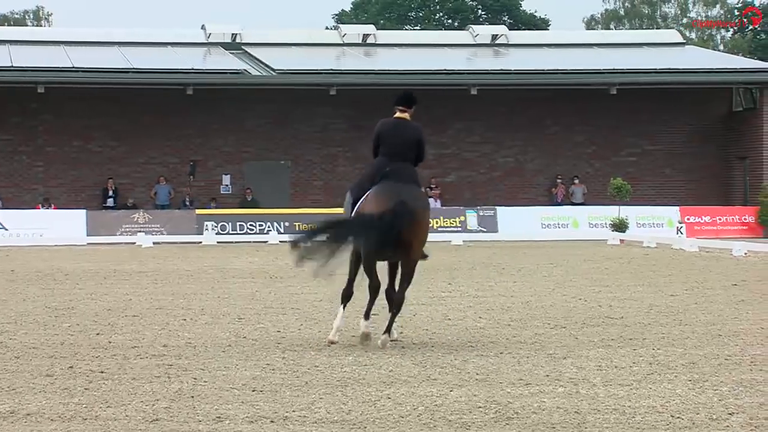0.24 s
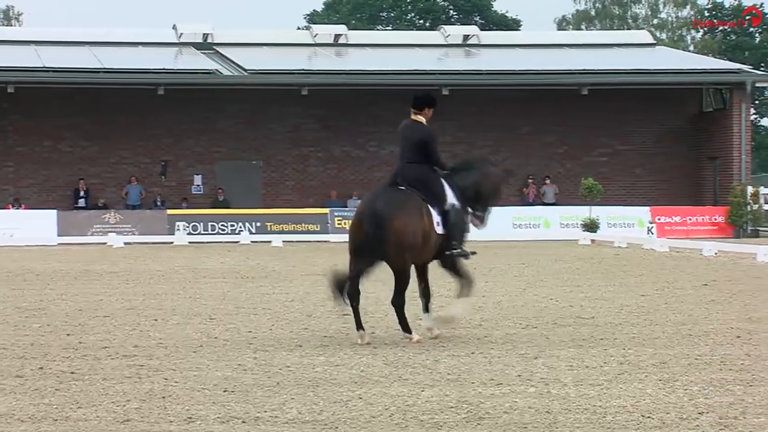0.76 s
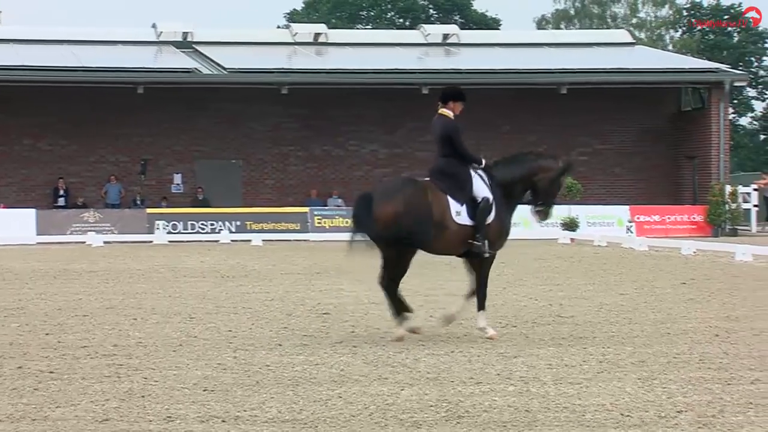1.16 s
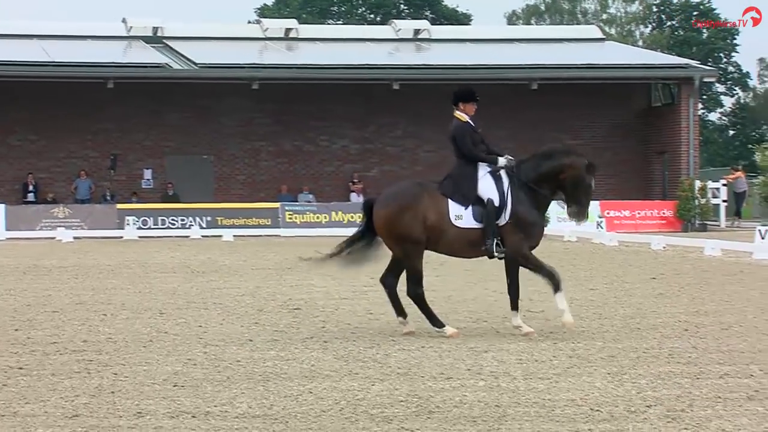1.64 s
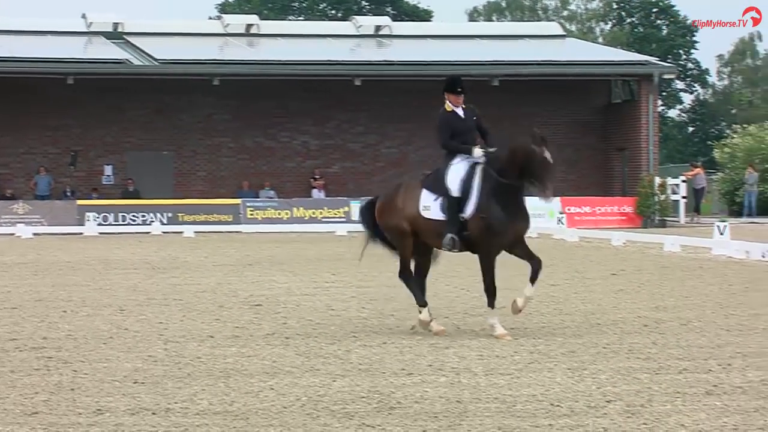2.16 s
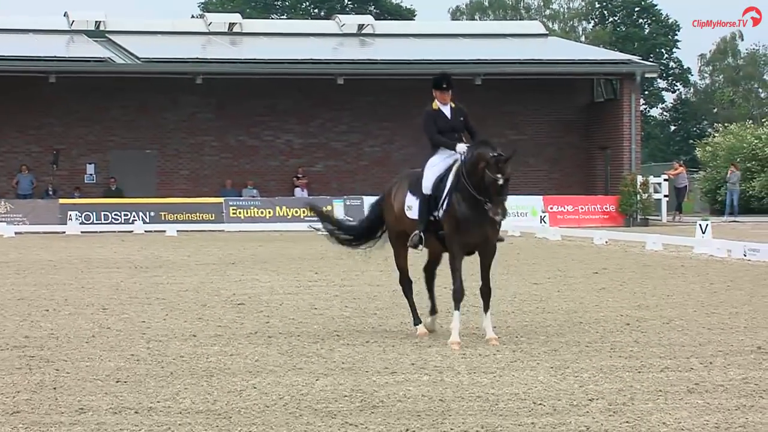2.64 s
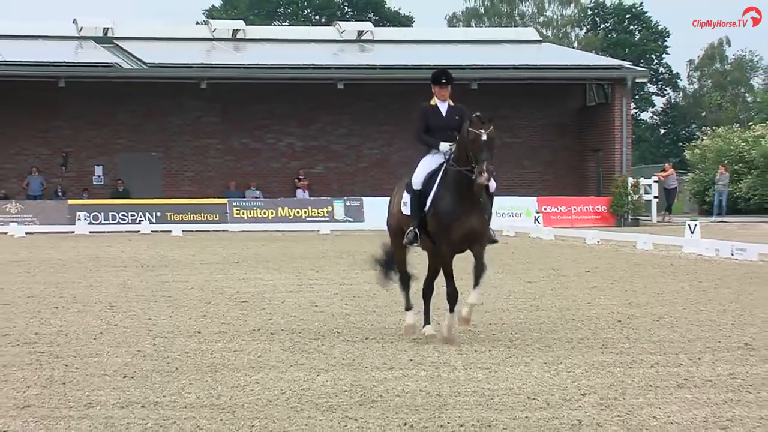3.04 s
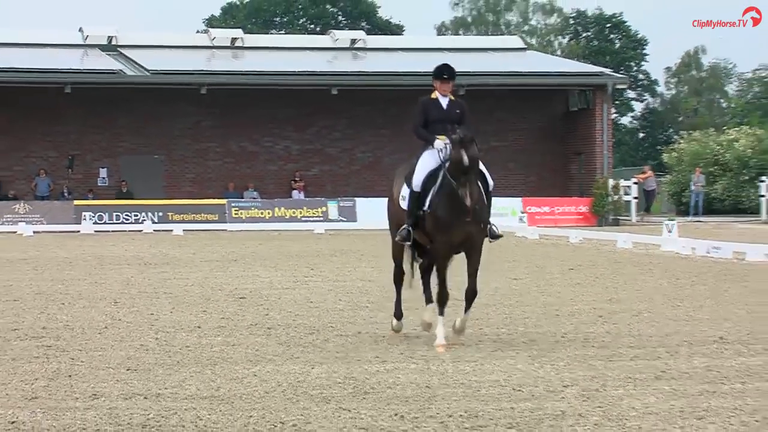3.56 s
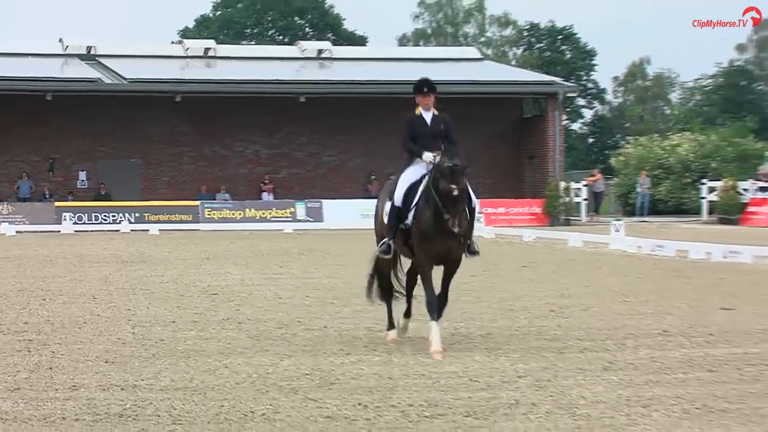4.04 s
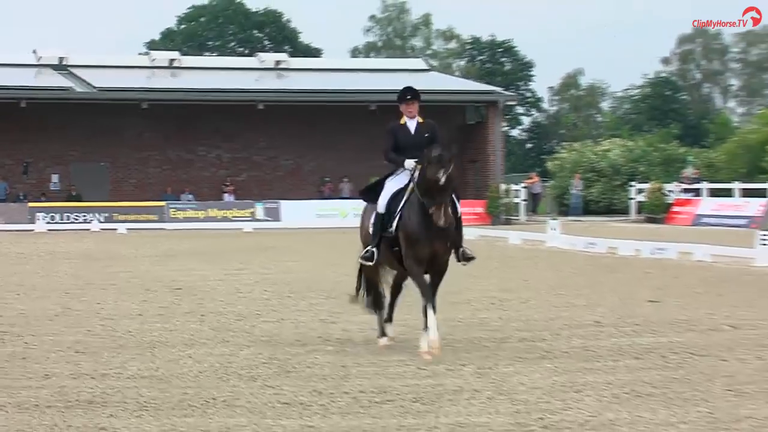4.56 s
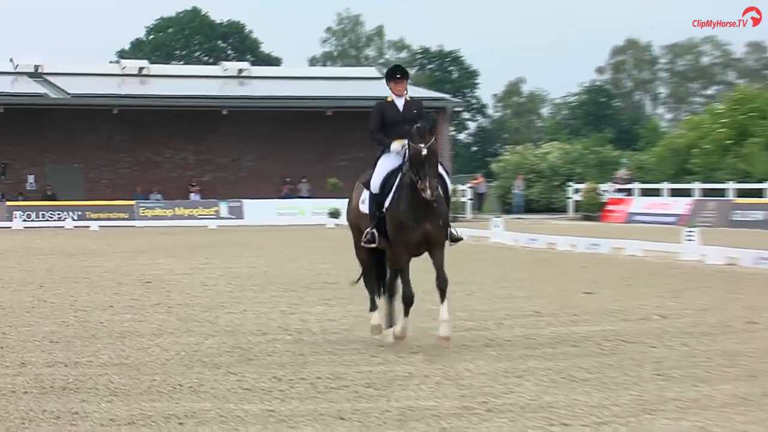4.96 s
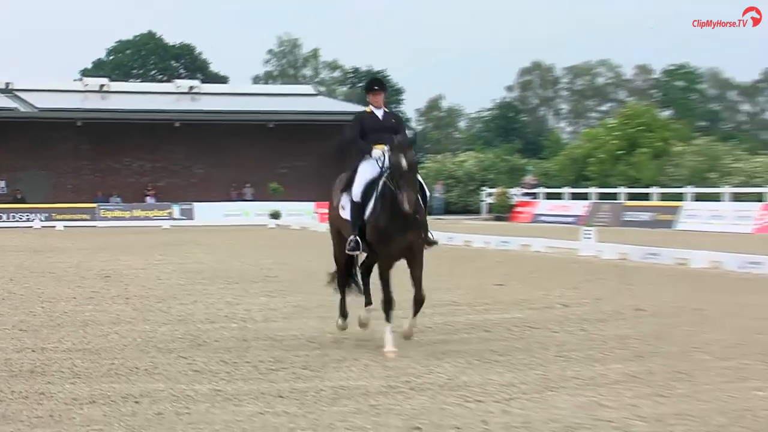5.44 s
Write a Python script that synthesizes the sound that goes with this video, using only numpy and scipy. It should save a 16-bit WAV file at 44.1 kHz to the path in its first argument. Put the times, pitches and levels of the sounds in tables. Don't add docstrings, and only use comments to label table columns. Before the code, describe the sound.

Outdoors in a sandy riding arena, a horse canters slowly: clustered dull thuds with woody knocks, about every 0.6 to 0.8 seconds. Each stride brings a low, fluttering snort, some followed by a thin inward hiss. Buckles tick faintly. Birds chirp near and far, with a livelier singer in the second half. Deep wind buffets bump the microphone over a quiet airy floor.

```python
import sys
import numpy as np
from scipy import signal
from scipy.fft import rfft, irfft
from scipy.io import wavfile
from scipy.ndimage import uniform_filter1d, map_coordinates

SR = 44100
rng = np.random.default_rng(int(sys.argv[2]) if len(sys.argv) > 2 else 0)


def digitize_waveform(pressure):
    field = np.atleast_2d(pressure).T
    bounded = np.clip(field, -1, 1)
    quanta = np.round(bounded * 32767).astype(np.int16)
    wavfile.write(sys.argv[1], SR, quanta)


def to_linear_factor(level_db):
    exponent = np.asarray(level_db, float) / 20
    return 10 ** exponent


N = 251811

UP_AND_DOWN, UP_AND_HOLD, DOWN = (-.85, -1), (-1, .25), (1, -.75)
# t/s, length/s, start f/Hz, end
# f/Hz, level/dB
TRILLS = [(-.05, .17, 2020, 2090, -67), (.11, .1, 2090, 2130, -72), (.1, .09, 2280, 2420, -72),
          (.175, .12, 2410, 2190, -70), (.32, .05, 2280, 2310, -75), (.4, .04, 2300, 2300, -88),
          (.425, .045, 6620, 6680, -80), (2.88, .08, 6800, 6700, -82), (.47, .1, 6680, 6600, -89),
          (.495, .03, 3400, 3100, -75), (.55, .025, 3250, 3200, -74), (.585, .05, 3000, 3150, -76)]
# t/s, length/s, start f/Hz, end f/Hz, level/dB
BEADS = [
    (1.534, .027, 2120, 2080, -68),
    (1.699, .066, 2160, 2130, -67),
]
# t/s, length/s, start f/Hz, end f/Hz, level/dB
RATTLE = [
    (5.632, .09, 4150, 2650, -58),
]
# t/s, length/s, top f/Hz, swing/share, level/dB
ARCHES = [(.026, .02, 5250, .25, -73), (.119, .025, 5300, .27, -71), (.207, .03, 3950, .17, -72),
          (.216, .022, 5150, .22, -72), (.254, .025, 3240, .14, -70), (.326, .042, 6100, .33, -75),
          (.794, .03, 5880, .14, -74), (.826, .042, 4750, .17, -65), (.075, .025, 5250, .18, -75),
          (1.409, .025, 3180, .1, -72), (1.968, .035, 5400, .2, -76), (2.105, .035, 5250, .13, -77),
          (2.027, .06, 2240, .25, -65), (2.18, .2, 1590, .02, -69), (2.323, .03, 5350, .1, -76),
          (2.57, .03, 3900, .13, -70), (2.614, .025, 3180, .09, -70), (3.237, .025, 5040, .16, -74),
          (4.588, .03, 5710, .16, -69), (4.936, .035, 5750, .13, -74)]
# t/s, length/s, middle f/Hz, swing/share, level/dB
RISES = [(.659, .015, 3500, .12, -71), (.736, .035, 4400, .17, -70), (.742, .025, 5470, .05, -71),
         (.803, .028, 3900, .12, -69), (.893, .035, 3700, .1, -70), (1.458, .08, 2370, .08, -74),
         (1.5, .035, 2110, .02, -63), (1.672, .035, 2220, .05, -72), (1.985, .05, 1700, .08, -68),
         (2.19, .045, 4200, .26, -75), (2.056, .035, 4200, .23, -74), (3.041, .055, 2300, .3, -77),
         (3.045, .045, 4700, .2, -74), (3.12, .02, 3000, .08, -76), (3.369, .025, 4900, .04, -69),
         (3.72, .02, 3250, .07, -70), (3.67, .012, 3300, .2, -70), (4.625, .02, 3900, .05, -68),
         (4.659, .035, 4820, .05, -60), (4.687, .022, 3750, .06, -53), (5.265, .02, 5700, .16, -68),
         (5.374, .018, 5700, .16, -72), (5.616, .014, 4000, .3, -67), (5.628, .022, 4700, .02, -66),
         (5.256, .012, 5200, .3, -72)]
# t/s, length/s, middle f/Hz, swing/share, level/dB
DROPS = [(.34, .03, 4500, .05, -74), (.742, .03, 5000, .05, -68), (.768, .015, 4200, .14, -72),
         (.925, .014, 3600, .12, -74), (2.59, .014, 3500, .15, -72), (3.388, .01, 4600, .1, -72),
         (.228, .014, 3600, .15, -72), (.195, .02, 5700, .08, -77), (.715, .04, 2480, .02, -81),
         (1.985, .03, 3600, .08, -75), (2.325, .02, 3700, .1, -75), (3.765, .02, 5700, .06, -72),
         (3.735, .015, 2900, .08, -73), (1.553, .025, 5450, .06, -69), (1.908, .025, 5500, .06, -76),
         (4.725, .03, 5500, .1, -70), (2.485, .06, 2180, .29, -71), (2.58, .035, 2290, .15, -70),
         (3.1, .045, 4600, .09, -75), (3.14, .028, 3500, .22, -72), (4.7, .028, 3300, .3, -57),
         (5.196, .12, 2280, .02, -79), (5.282, .028, 3150, .21, -69)]
# (t after start/s, length/s, middle f/Hz, swing/share, level/dB), shape
HOOK = [((0, .014, 3600, .26, -3), (-1, .2)), ((.006, .03, 3830, .015, 0), UP_AND_DOWN),
        ((.031, .02, 4250, .3, -3), (1, -.15))]
FALL = [((0, .047, 3200, .42, 0), (1, -.3))]
SCOOP = [((0, .009, 3900, .4, -12), (1, -.4)), ((.007, .02, 2750, .2, -9), (1, -.7)),
         ((.028, .025, 3170, .12, 1), (-1, 0)), ((.048, .028, 2400, .3, -18), DOWN)]
PIP = [((0, .03, 5390, .045, 0), DOWN)]
# t/s, pitch/ratio, level/dB
HOOKS = [
    (3.259, 1.1, -67.5),
    (3.475, 1.07, -65),
    (3.679, 1.05, -61.5),
    (3.855, 0.995, -56.5),
    (4.032, 1.024, -57),
]
SCOOPS = [
    (4.704, 0.95, -57.5),
    (4.852, 1.02, -56),
    (4.99, 0.99, -54),
    (5.125, 1.01, -53.5),
    (5.47, 0.97, -58.5),
]
PIPS = [
    (4.165, 1.01, -74),
    (4.31, 1, -74),
    (4.522, 1.001, -69),
    (4.734, 1.3, -79),
]
TRILL_PER_S, BEAD_PER_S, BUZZ_PER_S, RATTLE_PER_S = 62, 76, 170, 68
RATTLE_FADE_DB = 5
FALL_FROM_S, FALL_EVERY_S, FALL_DB = 4.134, .0834, -56.5

# t of closing/s, jet level/dB
FLAPS = [(0.103, -83), (0.784, -79), (0.825, -88), (0.871, -82.5), (0.92, -86), (1.06, -85), (1.099, -84.5),
         (1.152, -85), (1.84, -83), (1.895, -89), (1.953, -84), (2.303, -79), (2.675, -78), (2.718, -76.5),
         (2.777, -78), (2.835, -78), (3.432, -82), (3.472, -82), (3.534, -77.5), (3.583, -75),
         (3.632, -75.5), (4.119, -80), (4.173, -76.5), (4.223, -70.5), (4.262, -76), (4.275, -75),
         (4.758, -76), (4.804, -72), (4.845, -74), (4.857, -74.5), (4.893, -72.5), (4.905, -67.5),
         (4.948, -79), (5.355, -76), (5.4, -72.5), (5.446, -68), (5.489, -77.5), (5.502, -68.5)]
# f/Hz, level/dB per Hz
ROAR = [(41, -41), (70, -10), (139, -3.5), (187, -9.5), (404, -10), (499, -13.5), (616, -11.5),
        (1220, -27.5), (2000, -22.5), (2600, -81), (4400, -120)]
# f/Hz, level/dB per Hz
JET = [(901, 6.5), (1501, -10), (2501, -8), (5001, -9), (7501, -10.5), (10001, -16.5), (13001, -25),
       (16001, -28)]
LEAK_DB = -9.5
NOSTRIL_HZ, NOSTRIL_WIDTH_HZ, NOSTRIL_DB = 1720, 237, 1
# t/s, length/s, level/dB, top f/Hz, chest rumble level/dB
BLOWS = [(0, 0.43, -62, 670, 0), (0.723, 0.25, -66, 885, 6), (1.016, 0.22, -59.5, 1040, -6.5),
         (1.497, 0.26, -55.5, 458, -9.5), (1.795, 0.22, -59.5, 980, 0.5), (2.202, 0.51, -62, 690, -4.5),
         (2.628, 0.26, -57.5, 1060, -8.5), (3.236, 0.21, -64, 765, 4.5), (3.393, 0.32, -57.5, 1060, -3),
         (3.715, 0.36, -60.5, 630, -1), (4.053, 0.29, -58, 1080, 1.5), (4.435, 0.23, -59, 720, 4),
         (4.684, 0.3, -55, 1050, 0.5), (5.035, 0.29, -58, 690, -7.5), (5.309, 0.28, -55.5, 1170, -1),
         (5.578, 0.4, -61.5, 594, -1.5)]
# t/s, length/s, level/dB
INTAKES = [
    (1.534, 0.23, -81),
    (2.43, 0.19, -82.5),
    (2.874, 0.15, -102),
    (3.184, 0.2, -82),
    (3.764, 0.26, -81),
    (4.446, 0.21, -77),
    (5.056, 0.22, -75),
    (5.61, 0.15, -84),
    (0.71, 0.26, -82),
]
# f/Hz, width/Hz, level/dB
INHALE = [(1800, 1360, 5), (5670, 1200, 2), (6440, 280, 3), (9250, 2700, -5.5), (9080, 1540, -3.5)]

# t/s, level/dB
CHORUS = [(0, -83.5), (.8, -78.5), (1.6, -80), (2.4, -86.5), (3.1, -82.5), (3.75, -75.5), (4.3, -73.5),
          (4.7, -70.5), (5.71, -78)]
# t/s, half width/s, level/dB
BUFFETS = [(.2, 0.27, -50), (0.631, 0.035, -52.5), (1.06, 0.13, -43.5), (1.212, 0.051, -36.5),
           (1.4, 0.075, -34.5), (1.579, 0.082, -40), (1.751, 0.081, -38.5), (2.047, 0.26, -49),
           (2.301, 0.045, -50.5), (2.492, 0.046, -46), (2.78, 0.24, -46), (3.203, 0.14, -40),
           (3.461, 0.073, -41.5), (3.629, 0.064, -42.5), (3.928, 0.16, -43), (4.33, 0.085, -40),
           (4.772, 0.084, -47.5), (5.009, 0.065, -40.5), (5.328, 0.21, -40.5), (5.62, 0.042, -46)]
CALM_DB = -65
# f/Hz, level/dB per Hz
AIR = [(40, -12), (70, -2), (155, -1), (400, -11), (600, -18), (950, -24), (1400, -37), (2600, -37),
       (5200, -39), (6500, -41.5), (8600, -48.5), (12400, -50), (16000, -53.5)]
AIR_DB = -60

# t/s, peak level/dB, thud f/Hz, knock level over thud/dB, knock f/Hz
HOOVES = [(0.099, -47.5, 164, -1.5, 750), (0.107, -38.5, 136, -11.5, 607), (0.157, -49, 256, -32, 590),
          (0.257, -49, 148, -4.5, 783), (0.631, -45.5, 125, -9.5, 960), (0.778, -36, 140, -17.5, 955),
          (0.878, -56, 265, 2.5, 550), (0.882, -38, 145, -17.5, 880), (1.412, -59, 155, 3, 610),
          (1.53, -48, 112, -7.5, 637), (1.666, -37, 122, -24, 754), (2.453, -44, 124, -10.5, 577),
          (2.536, -44, 128, -8.5, 647), (3.086, -46.5, 177, -12.5, 815), (3.284, -41, 153, -46, 590),
          (3.32, -41, 108, -9, 644), (3.57, -42, 142, -3.5, 606), (4.207, -39, 151, -9, 600),
          (4.808, -38, 120, -11, 520), (4.853, -36.5, 126, -20, 610), (4.865, -37.5, 114, -14, 790),
          (4.907, -32.5, 132, -14, 530), (5.448, -36, 126, -15, 610), (3.987, -31, 144, -18.5, 652),
          (4.055, -45, 201, -20, 583), (4.616, -35.5, 147, -5.5, 703), (4.668, -55, 124, 0, 700),
          (5.243, -36.5, 143, -10, 584), (1.069, -56, 150, -1.5, 900), (1.834, -57, 148, 4.5, 560),
          (1.953, -54, 151, -3, 800), (2.76, -49, 150, -5, 516), (4.089, -56, 150, 4, 670),
          (4.754, -55, 152, -4, 585), (5.402, -47, 150, 4.5, 590), (3.815, -49, 171, -12, 590)]
# pitch/ratio, level/dB, t60/s
KNOCK = [(.55, -5.5, 0.039), (.75, 5.5, 0.0076), (1.01, -2, 0.026), (1.25, 5.5, 0.0074)]

# t/s, length/s, start f/Hz, end f/Hz, level/dB
BUZZES = [(5.298, .024, 5200, 4100, -59), (5.318, .022, 4250, 3950, -60), (5.408, .024, 5200, 4050, -59),
          (5.428, .022, 4200, 3900, -61), (5.512, .022, 3100, 2700, -64), (5.484, .014, 3300, 3100, -67),
          (.636, .025, 2000, 1800, -80)]
# t from hook/s, length/s, start f/Hz, end f/Hz, level/dB
LEAD_IN = (-.055, .038, 5550, 5100, -14)
# (t after start/s, length/s, middle f/Hz, swing/share, level/dB), shape
STEP = [((0, .02, 4550, .07, -1), (-1, -.3)), ((.022, .018, 3870, .07, 0), UP_AND_DOWN),
        ((.042, .016, 3720, .07, -2), UP_AND_DOWN), ((.056, .016, 3230, .05, -1), DOWN)]
# t/s, pitch/ratio, level/dB
STEPS = [
    (1.564, 1.01, -65),
    (1.742, 1.03, -70),
    (2.702, 1.0, -64),
    (3.529, 1.014, -63),
]
# t/s, length/s, middle f/Hz, swing/share, level/dB
GLIDES = [
    (1.068, .035, 4150, .13, -67),
    (1.096, .095, 3640, .085, -63),
    (2.675, .035, 4050, .07, -70),
    (2.93, .03, 3400, .05, -74),
    (1.645, .02, 4700, .1, -74),
]

# t/s, peak level/dB, middle f/Hz
TICKS = [(0.707, -70.5, 6000), (0.983, -72, 9000), (1.473, -61.5, 5200), (1.753, -69, 6500),
         (2.041, -74.5, 8000), (2.288, -69, 4800), (2.872, -68, 7000), (3.062, -71, 6440),
         (3.239, -72, 8500), (3.995, -71, 8500), (4.435, -74, 7500), (4.625, -72, 7950), (4.824, -66, 7000),
         (4.875, -60.5, 6800), (4.919, -72, 7500), (4.927, -80, 8000), (4.996, -72, 6800),
         (5.017, -76, 8000), (5.027, -77, 7500), (5.519, -70, 7500), (5.581, -79, 7500), (5.62, -76, 6500),
         (0.863, -79, 8000)]
# t/s, length/s, start f/Hz, end f/Hz, level/dB
GRUNTS = [
    (3.328, 0.044, 628, 595, -58),
    (3.751, 0.0575, 725, 539, -61.5),
]


def rms_one(x):
    return x / np.sqrt(np.mean(x ** 2) + 1e-20)


def in_time(rows):
    s, *columns = np.transpose(rows)
    return [np.interp(np.arange(N) / SR, s, c) for c in columns]


def butter(x, hz, kind, order=2):
    return signal.sosfilt(signal.butter(order, hz, kind, fs=SR, output="sos"), x)


def drift(rate_hz):
    knots = rng.standard_normal(2000)
    return rms_one(map_coordinates(knots, [5 + np.arange(N) / SR * 2 * rate_hz], order=3))


def coloured(spectrum, patchy_db):
    hz = np.arange(N // 2 + 1) * SR / N + 1
    point_hz, point_db = np.array(spectrum, float).T
    curve_db = np.interp(np.log(hz), np.log(point_hz), point_db, left=-90, right=-90)
    shaped = rfft(rng.standard_normal(N)) * to_linear_factor(curve_db)
    slices = (2 * np.log2(hz / 40)).astype(int)
    out = np.zeros(N)
    for k in range(2, 18):
        out += irfft(shaped * (slices == k), N) * to_linear_factor(patchy_db * drift(11))
    return rms_one(out)


def resonance(x, hz, width_hz):
    r = np.exp(-np.pi * width_hz / SR)
    zeros = np.array([1, 0, -1]) * (1 - r * r) / 2
    return signal.lfilter(zeros, [1, -2 * r * np.cos(2 * np.pi * hz / SR), r * r], x)


def add(out, s, sound):
    at = round(s * SR)
    sound = sound[max(0, -at):N - at]
    out[max(at, 0):max(at, 0) + len(sound)] += sound


def ring(hz, t60_s, rise_s):
    t = np.arange(4000) / SR
    return np.sin(2 * np.pi * hz * t) * to_linear_factor(-60 * t / t60_s) * (1 - np.exp(-t / rise_s))


def swell(length_s, edge):
    return np.sin(np.linspace(0, np.pi, round(length_s * SR))) ** edge


def tone(hz, throb, edge):
    waver = np.interp(np.arange(len(hz)) / 70, np.arange(200), rng.normal(1, .010, 200))
    phase = 2 * np.pi * np.cumsum(hz * waver) / SR
    return np.sin(phase) * throb * np.sin(np.linspace(0, np.pi, len(hz))) ** edge


def rasp(depth):
    return 1 + depth * rms_one(butter(rng.standard_normal(N), 420, "low"))


def pulsed(rows, per_s, fall_hz, depth, stray_hz):
    out = np.zeros(N)
    for s, length_s, start_hz, end_hz, db in rows:
        q = np.linspace(0, 1, round(length_s * SR))
        count, stroke = np.divmod(q * length_s * per_s, 1)
        stray = stray_hz * rng.standard_normal(40)[count.astype(int)]
        hz = start_hz + (end_hz - start_hz) * q + fall_hz * (.5 - stroke) + stray
        throb = 1 - depth * np.cos(np.pi * stroke) ** 2
        add(out, s, to_linear_factor(db + 3) * tone(hz, throb, edge=.3))
    return out


def whistle(shape, s, length_s, hz, swing, db):
    out = np.zeros(N)
    q = np.linspace(0, 1, round(length_s * SR))
    first, last = shape
    bend = first * (1 - q) * (1 - 2 * q) + last * q * (2 * q - 1)
    add(out, s, to_linear_factor(db - 1) * tone(hz * (1 + swing * bend), 1, edge=.4))
    return out


def sing(figure, sung):
    out = np.zeros(N)
    for s, ratio, db in sung:
        for (after_s, length_s, hz, swing, note_db), shape in figure:
            out += whistle(shape, s + after_s, length_s, ratio * hz, swing, db + note_db)
    return out


def near_birds():
    out = np.zeros(N)
    for shape, rows in ((UP_AND_DOWN, ARCHES), (UP_AND_HOLD, RISES), (DOWN, DROPS)):
        for row in rows:
            out += whistle(shape, *row)
    falls = [(FALL_FROM_S + k * FALL_EVERY_S, 1.0, FALL_DB) for k in range(6)]
    out += sing(HOOK, HOOKS) + sing(FALL, falls) + sing(SCOOP, SCOOPS) + sing(PIP, PIPS)
    out += pulsed(TRILLS, TRILL_PER_S, fall_hz=-90, depth=.6, stray_hz=45) * rasp(.3)
    out += pulsed(BEADS, BEAD_PER_S, fall_hz=-150, depth=1, stray_hz=25)
    fade = np.clip((np.arange(N) / SR - 5.65) / .05, 0, 1)
    rattle = pulsed(RATTLE, RATTLE_PER_S, fall_hz=1400, depth=.5, stray_hz=40)
    out += rattle * to_linear_factor(-RATTLE_FADE_DB * fade)
    return out * to_linear_factor(1.4 * drift(60)) * rasp(.15)


def flaps():
    t = np.arange(N) / SR
    jet, kick, slaps = np.zeros((3, N))
    for s, db in FLAPS:
        late = t - s - .005
        width_s = np.where(late < 0, .017, .006)
        power = np.where(late < 0, 1.8, 2)
        jet += to_linear_factor(db + 7.5) * np.exp(-np.abs(late / width_s) ** power)
        kick += np.exp(-((late - .003) / .012) ** 2)
        add(slaps, s, to_linear_factor(db + 34.0) * ring(122.8, 0.076, 0.047))
    jet += to_linear_factor(LEAK_DB) * uniform_filter1d(jet, size=3500)
    gritty = coloured(JET, patchy_db=.5) * to_linear_factor(2.5 * drift(120))
    gritty += to_linear_factor(NOSTRIL_DB) * resonance(gritty, NOSTRIL_HZ, NOSTRIL_WIDTH_HZ)
    return slaps + to_linear_factor(-2.6) * jet * gritty, kick


def outflow(kick):
    out = np.zeros(N)
    rush = coloured(ROAR, patchy_db=1.5) * to_linear_factor(4.4 * kick + 1.9 * drift(70) + 2.1 * drift(160))
    chest = butter(rush, 330, "low", order=1)
    for s, length_s, db, top_hz, low_db in BLOWS:
        shape = swell(length_s, edge=0.39)
        at = round(s * SR)
        air = (rush + (to_linear_factor(low_db) - 1) * chest)[at:at + len(shape)]
        add(out, s, to_linear_factor(db) * butter(air * shape[:len(air)], top_hz, "low", order=4))
    return out


def inhale():
    intake, nose = np.zeros((2, N))
    for s, length_s, db in INTAKES:
        add(intake, s, to_linear_factor(db) * swell(length_s, edge=0.66))
    white = rng.standard_normal(N)
    for hz, width_hz, db in INHALE:
        nose += to_linear_factor(db) * resonance(resonance(white, hz, width_hz), hz, width_hz)
    return intake * rms_one(nose) * to_linear_factor(1.2 * drift(45))


def breath():
    flutter, kick = flaps()
    return outflow(kick) + flutter + inhale()


def far_birds():
    out, q = np.zeros(N), np.linspace(0, 1, 900)
    for when, pitch, sweep, size in rng.random((1100, 4)):
        arch = 1.06 + 0.897 * (sweep - .6) * (q - .5) - 0.789 * (q - .5) ** 2
        add(out, when * N / SR, to_linear_factor(3 * size) * tone(3000 * 1.65 ** pitch * arch, 1, edge=1))
    return rms_one(butter(out, 5200, "low"))


def scatter(x, t60_s):
    out, t, hop = np.zeros(N), np.arange(22000) / SR, 8192
    padded = np.pad(x, (hop, 2 * hop))
    fade = signal.windows.hann(2 * hop, sym=False)
    for at in range(0, N + hop, hop):
        tail = rng.standard_normal(len(t)) * to_linear_factor(-60 * t / t60_s) * (t > .004)
        tail /= np.sqrt(.75 * np.sum(tail ** 2))
        add(out, (at - hop) / SR, signal.fftconvolve(padded[at:at + 2 * hop] * fade, tail))
    return out


def wind():
    t = np.arange(N) / SR
    gust = to_linear_factor(CALM_DB) + sum(to_linear_factor(db) * np.exp(-((t - s) / half_s) ** 2) for s, half_s, db in BUFFETS)
    lumps = butter(butter(rng.standard_normal(N), 22.1, "low"), 12.5, "high")
    lumps = rms_one(butter(lumps, 44, "low", order=1))
    evened = lumps / (uniform_filter1d(np.abs(lumps), size=5000) + 0.77)
    return gust * rms_one(evened)


def open_air():
    return to_linear_factor(AIR_DB - 2.5) * coloured(AIR, patchy_db=.8)


def hooves():
    out, t = np.zeros(N), np.arange(4000) / SR
    grains = rng.standard_normal((len(HOOVES), len(t)))
    for (s, db, hz, knock_db, knock_hz), grain in zip(HOOVES, grains):
        add(out, s + 0.0038, -to_linear_factor(db + 7.0) * ring(hz, 0.026, 0.0026))
        for k, (ratio, mode_db, t60_s) in enumerate(KNOCK):
            level = (-1) ** k * to_linear_factor(db + knock_db + mode_db + 7.5)
            add(out, s + 0.0014, level * ring(knock_hz * ratio, t60_s, 0.0023))
        puff = butter(grain, [250, 1200], "band") * to_linear_factor(-60 * t / 0.084)
        add(out, s + 0.00411, to_linear_factor(db + knock_db - 2.0) * puff)
    return butter(out, 1170, "low", order=4)


def roof_birds():
    before_s, length_s, start_hz, end_hz, lead_db = LEAD_IN
    lead_ins = [(s + before_s, length_s, start_hz, end_hz, max(db + lead_db, -72)) for s, _, db in HOOKS]
    hoarse = sing(STEP, STEPS)
    hoarse += pulsed(BUZZES + lead_ins, BUZZ_PER_S, fall_hz=1000, depth=.7, stray_hz=150)
    glides = sum(whistle(DOWN, *row) for row in GLIDES)
    out = hoarse * rasp(.45) + glides * rasp(.25)
    return out + to_linear_factor(-5.0) * scatter(out, t60_s=0.44)


def tack():
    out, t = np.zeros(N), np.arange(400) / SR
    for (s, db, hz), grain in zip(TICKS, rng.standard_normal((len(TICKS), len(t)))):
        burst = grain * to_linear_factor(-60 * t / .013)
        add(out, s, to_linear_factor(db + 5) * butter(burst, [.6 * hz, 1.4 * hz], "band", order=1))
    return out


def grunts():
    out = np.zeros(N)
    for s, length_s, start_hz, end_hz, db in GRUNTS:
        hz = np.linspace(start_hz, end_hz, round(length_s * SR))
        add(out, s, to_linear_factor(db) * tone(hz, 1, edge=.8))
    return out


def scene():
    birds, far = near_birds(), far_birds()
    horse = hooves() + tack() + grunts()
    far_blur = to_linear_factor(-2.5) * far + to_linear_factor(-6.0) * scatter(far, t60_s=0.29)
    chorus = to_linear_factor(in_time(CHORUS)[0]) * far_blur
    bird_echoes = to_linear_factor(-9.5) * scatter(birds, t60_s=.36) + to_linear_factor(-13.0) * scatter(birds, t60_s=0.087)
    horse_echoes = to_linear_factor(-15.5) * scatter(horse, t60_s=0.36)
    near = horse + horse_echoes + breath() + roof_birds() + birds + bird_echoes
    return (near + chorus + wind() + open_air())[None]


def low_pass(x):
    return signal.sosfilt(signal.butter(12, 15500, fs=SR, output="sos"), x)


def record(dry):
    return low_pass(dry)


dry = scene()
out = record(dry)
digitize_waveform(out)
```